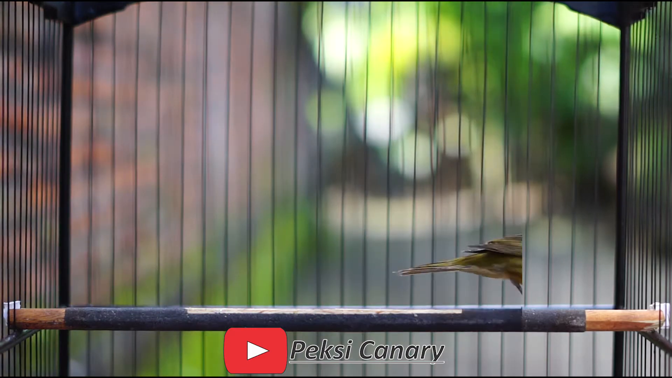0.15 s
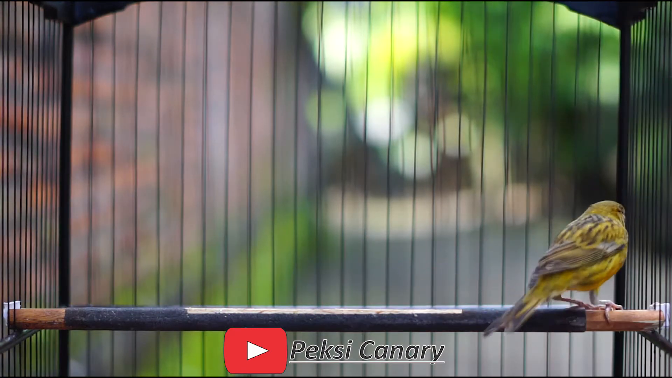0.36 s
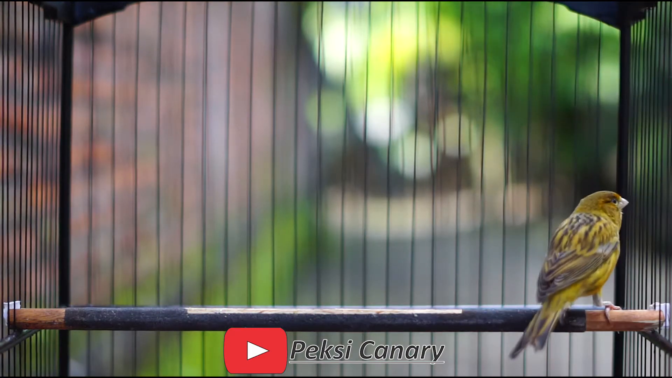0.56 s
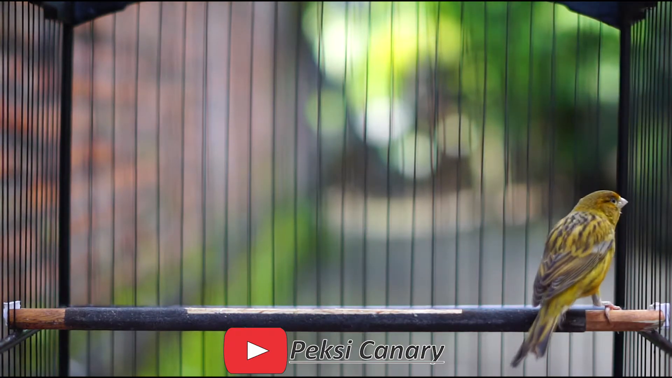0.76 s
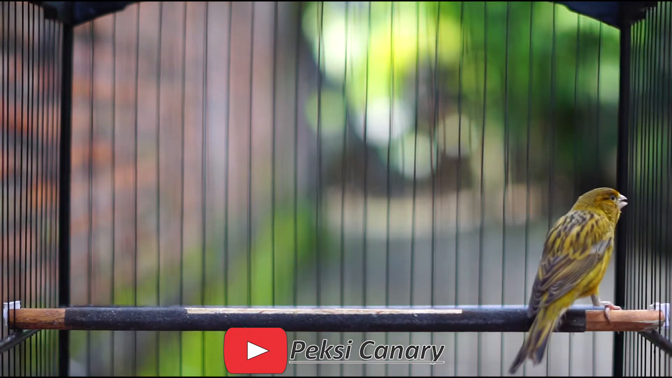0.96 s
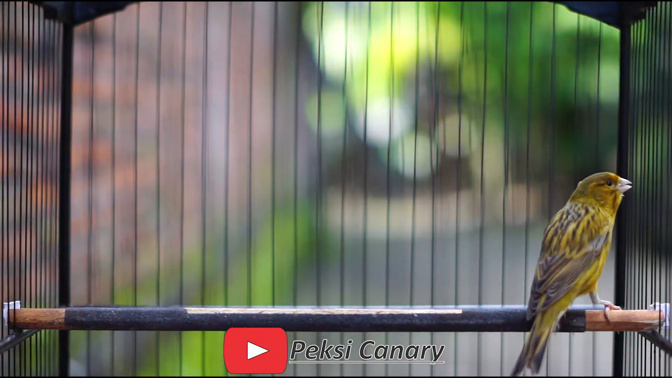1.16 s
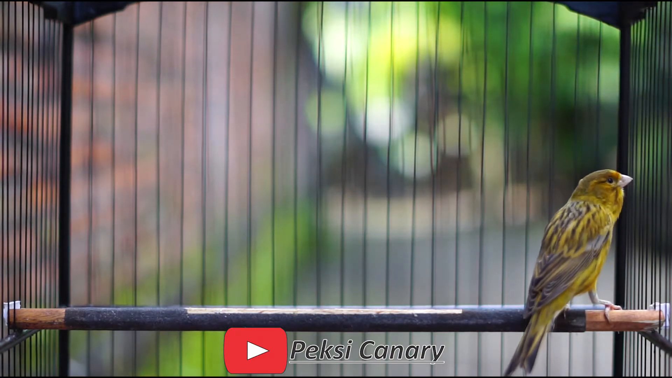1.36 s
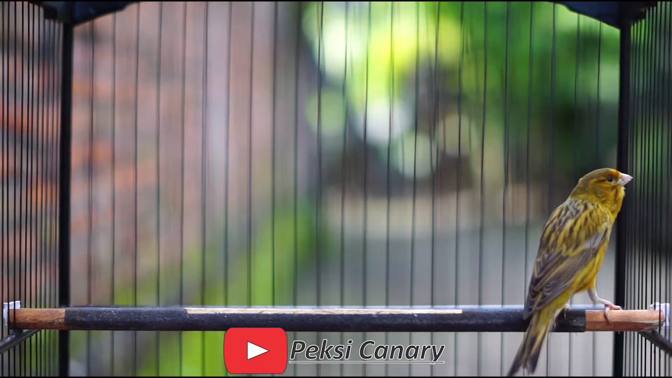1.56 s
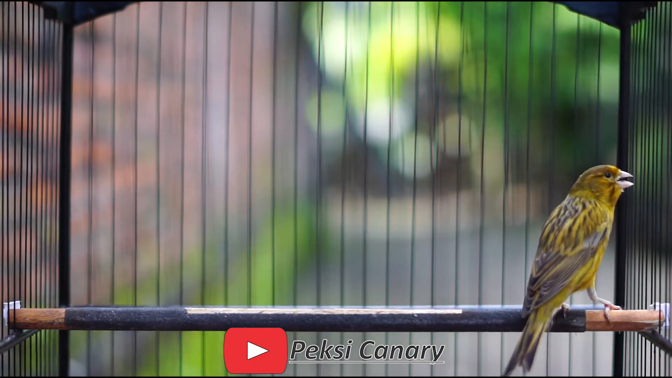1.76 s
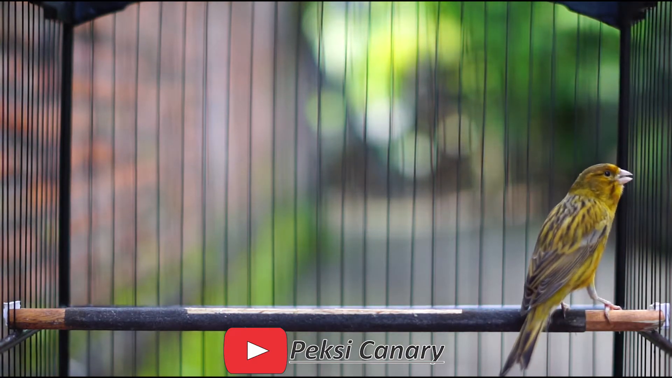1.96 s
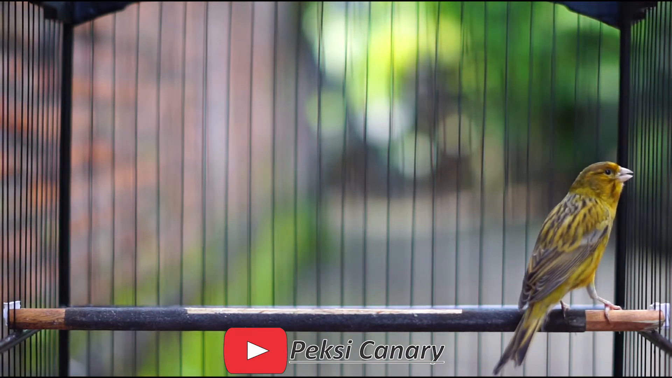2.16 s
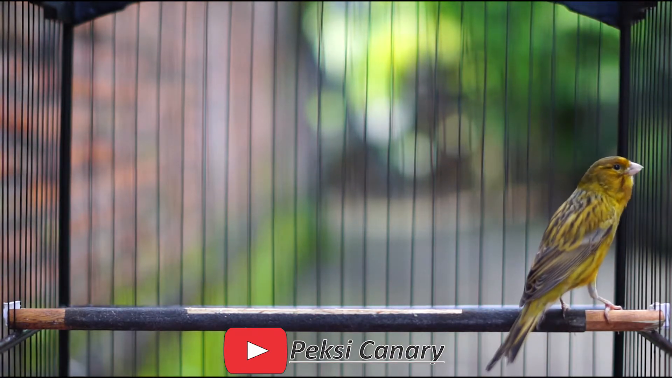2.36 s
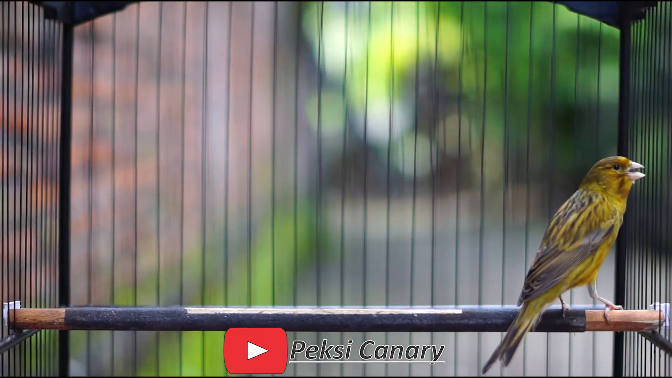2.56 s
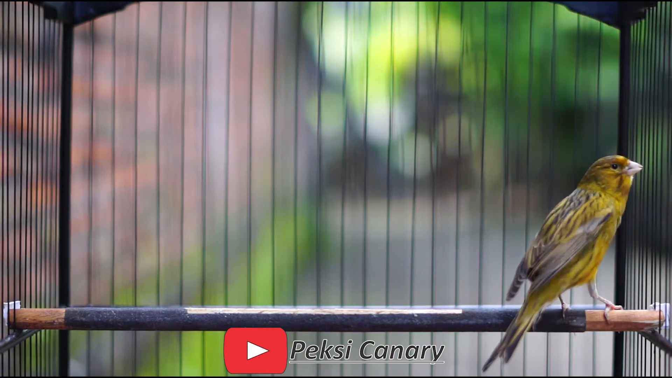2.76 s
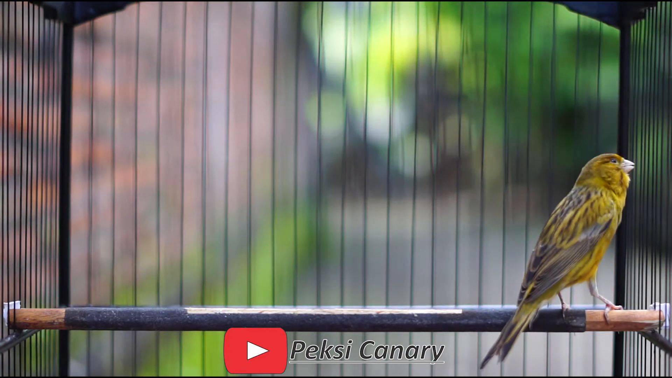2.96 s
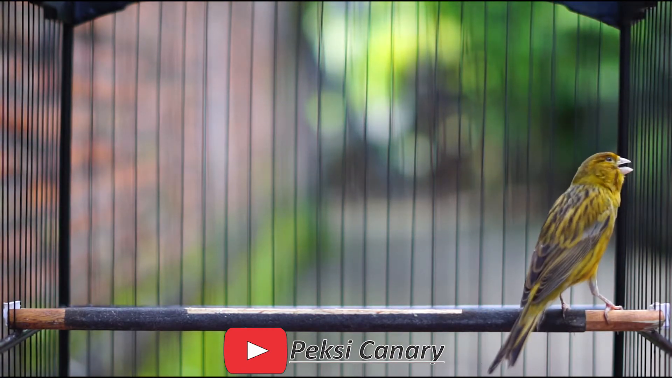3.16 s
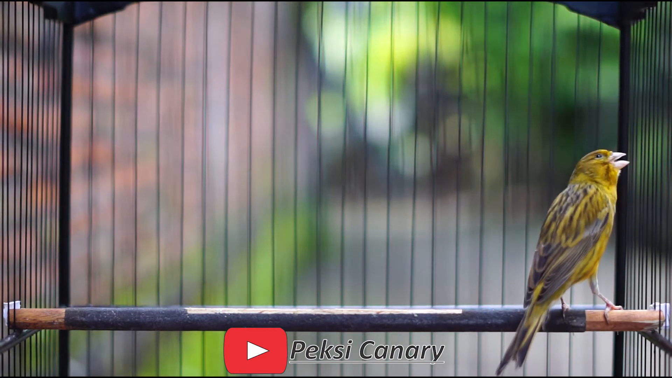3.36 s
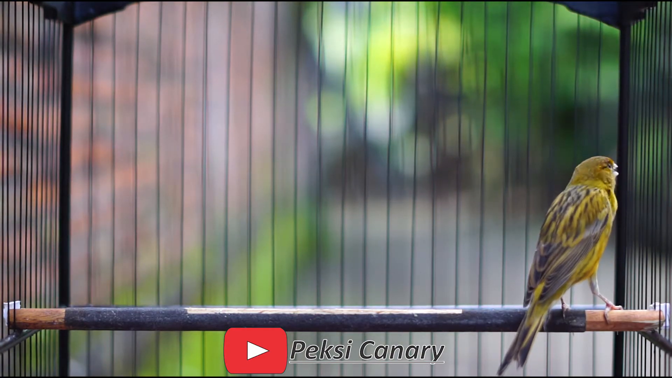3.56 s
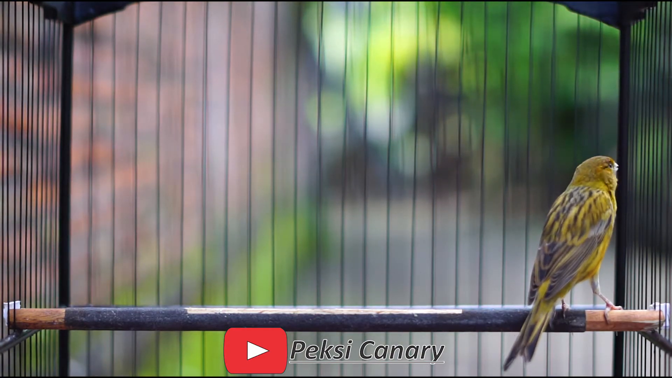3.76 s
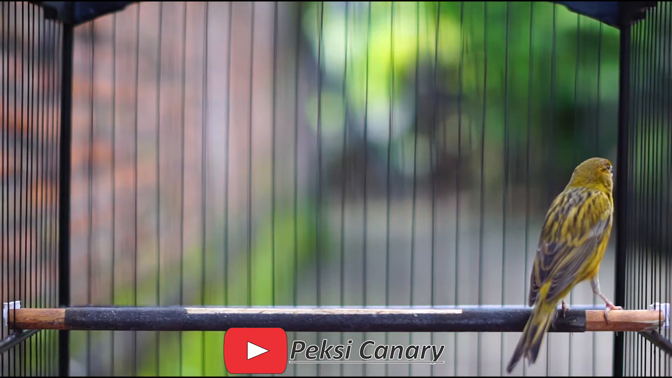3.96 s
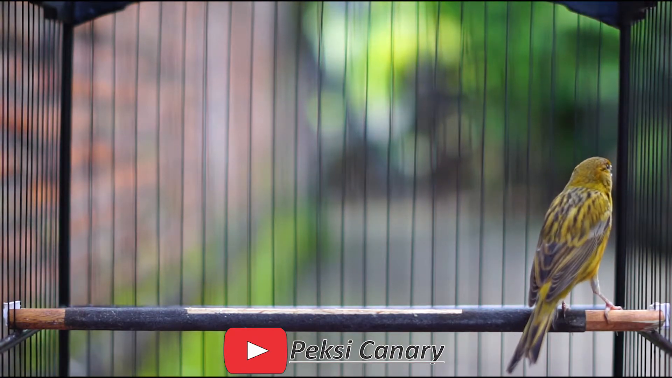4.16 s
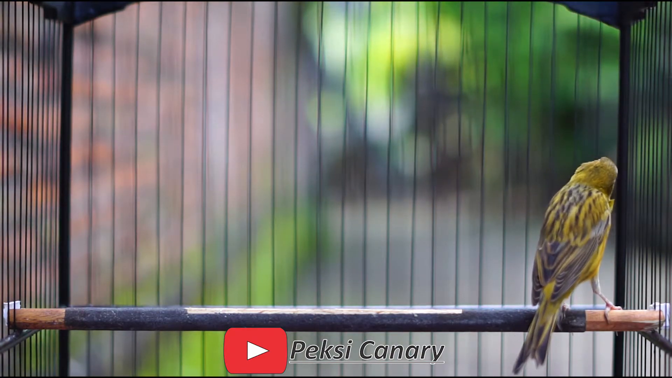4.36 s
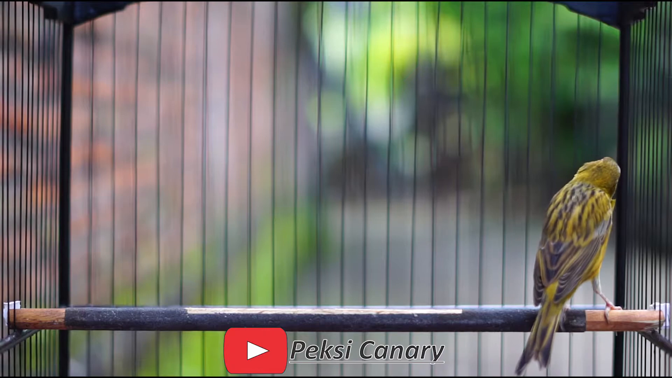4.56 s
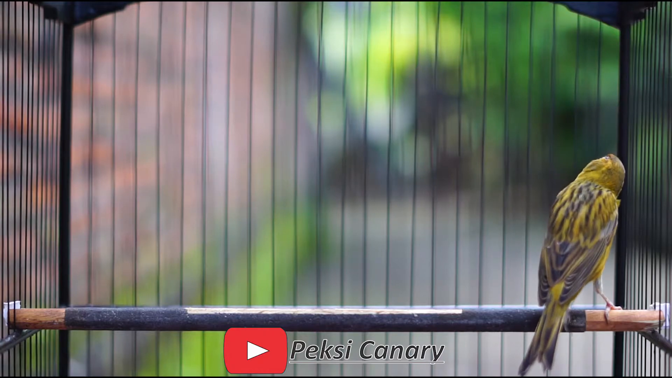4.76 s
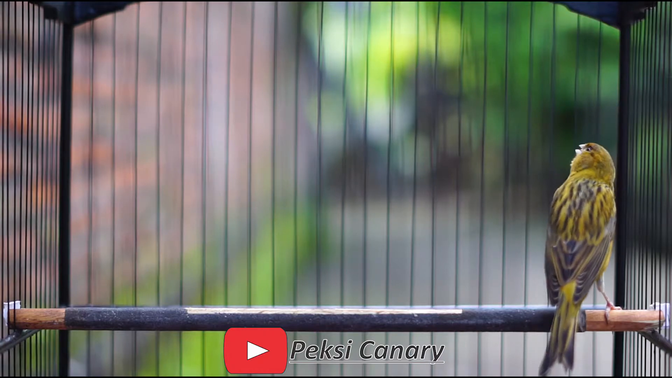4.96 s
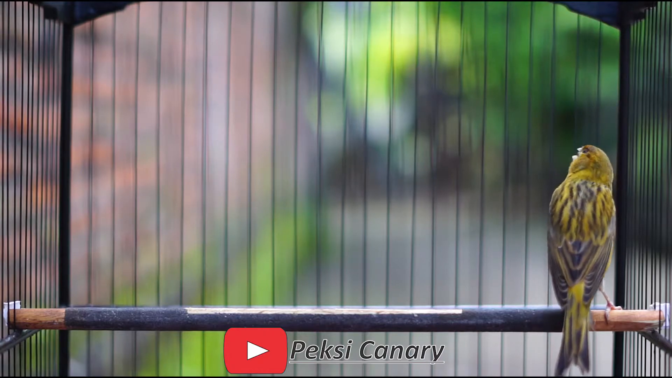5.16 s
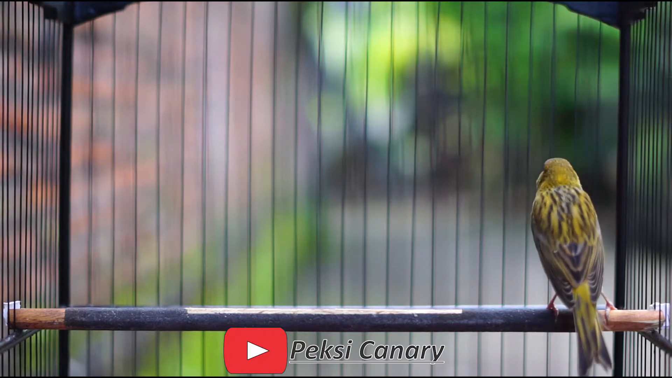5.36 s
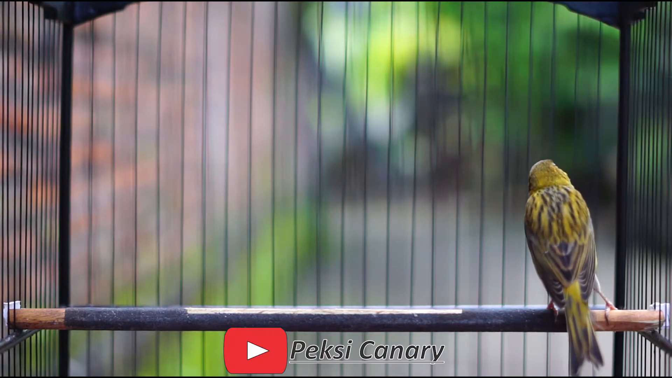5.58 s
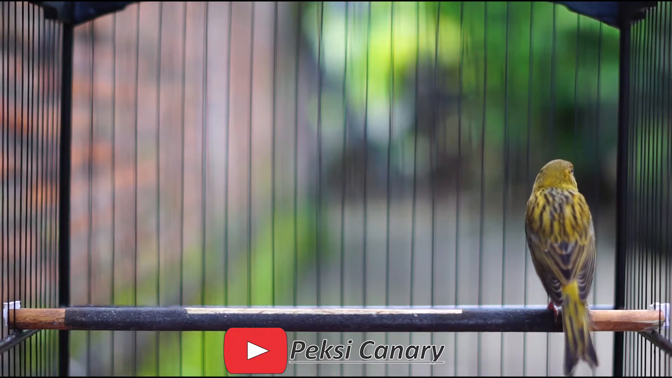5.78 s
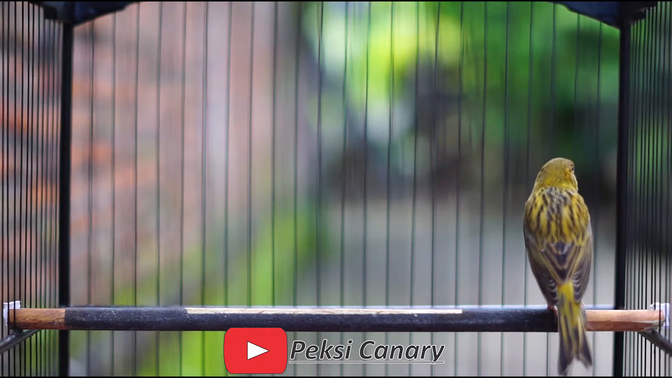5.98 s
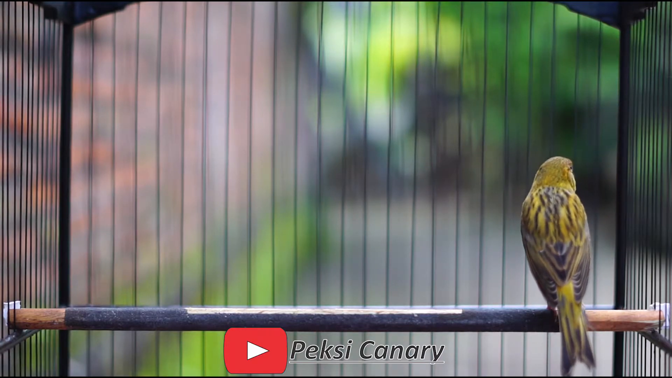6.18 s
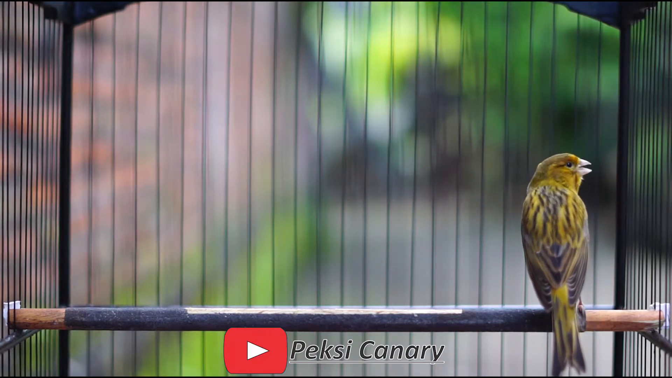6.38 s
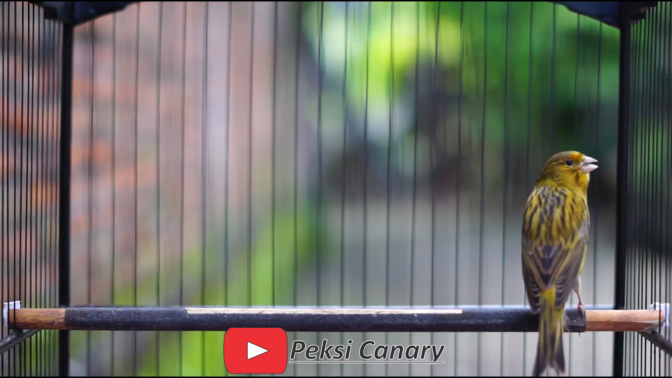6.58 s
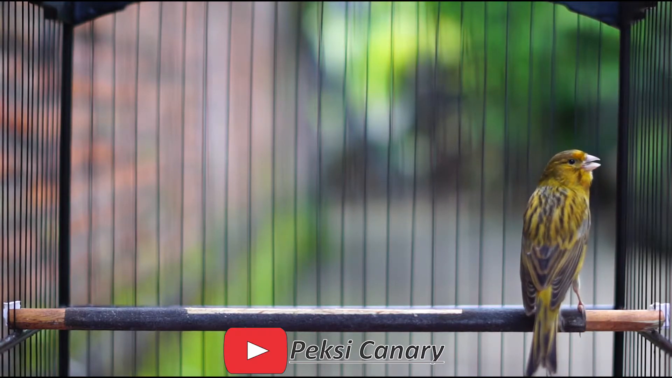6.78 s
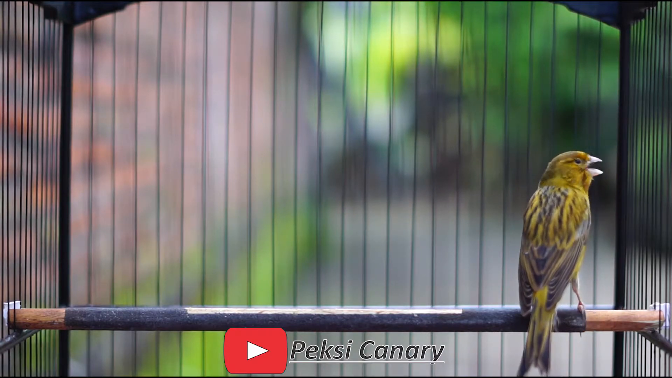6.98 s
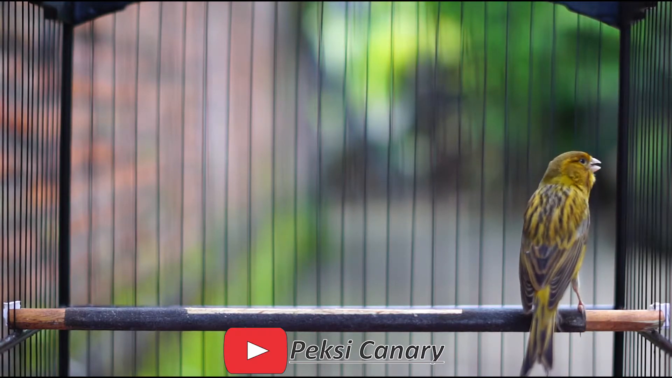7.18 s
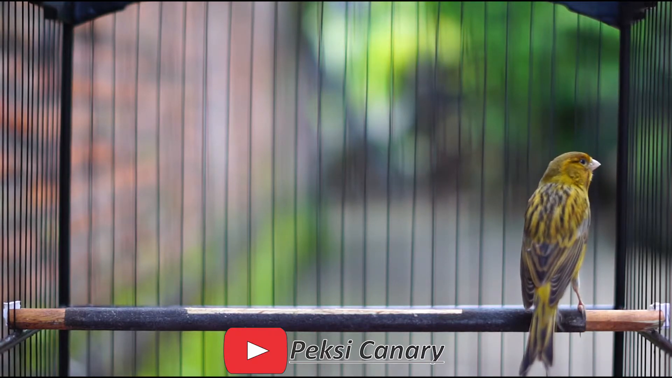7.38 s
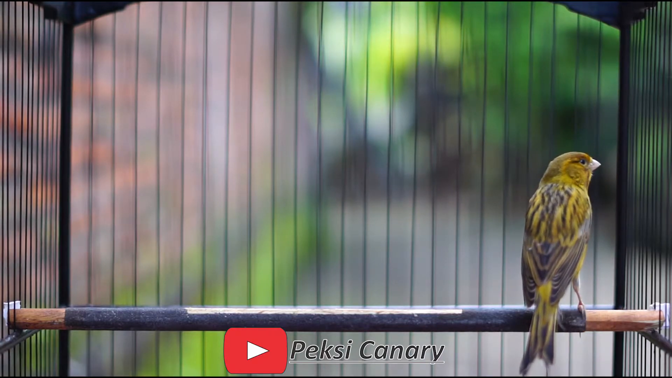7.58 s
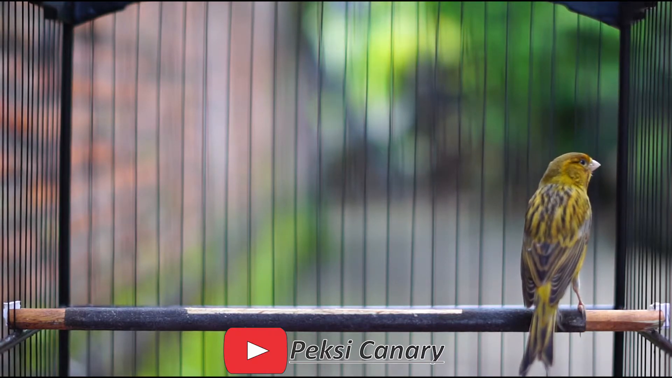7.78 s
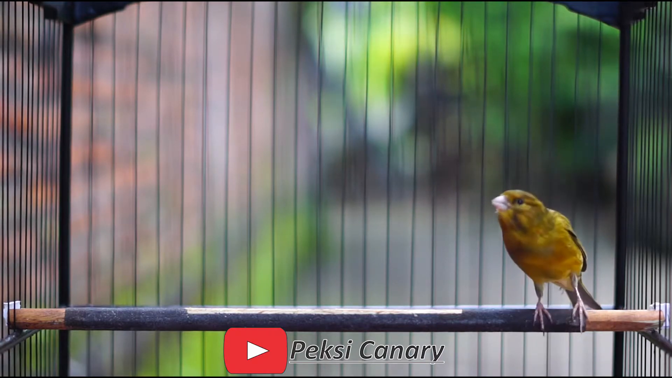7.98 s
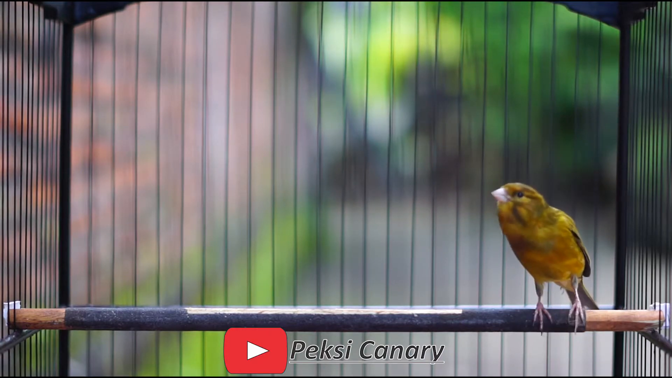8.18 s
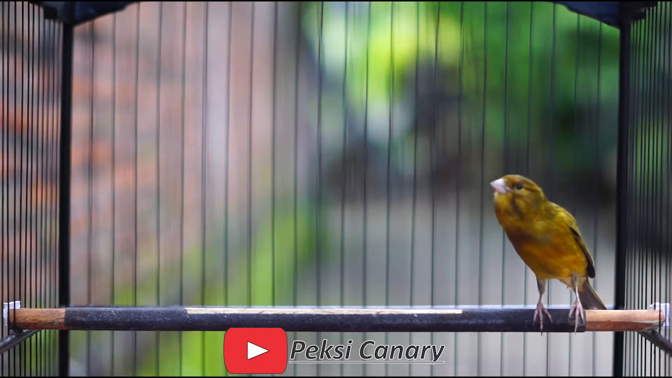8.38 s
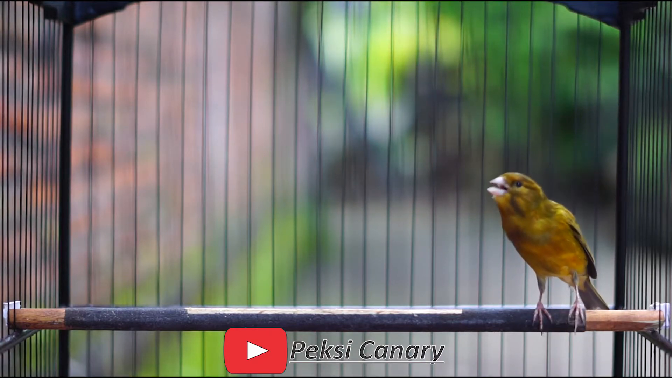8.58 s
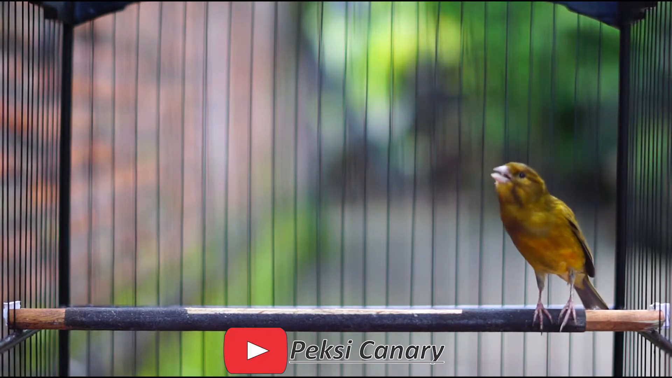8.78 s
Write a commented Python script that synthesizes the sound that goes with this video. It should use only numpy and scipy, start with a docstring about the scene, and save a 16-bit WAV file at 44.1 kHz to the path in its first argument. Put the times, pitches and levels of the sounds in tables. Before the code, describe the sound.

Bright, close canary song moves from short chirps through rolling notes, long sinking whistles, quick climbing whistles and a rapid trill, with a brief gap before resuming.

```python
"""Canary in a cage

A canary sings in a wire cage by a wall: chirps, a rolling three-note tour, long falling whistles, rising
whistles, a fast trill, a pause, and the tour again. Each note is a gliding near-pure tone with weak overtones,
coloured by the throat and by close echoes. Feet tick (dying noise); fluttering noise, hissy and deep, swells
softly early on and sets in suddenly near 7.8 s for about a second. A low noise rumble, a hum of wavering
sines and faint gliding calls lie behind.
"""
import sys
import numpy as np
from scipy import signal
from scipy.fft import rfft, irfft
from scipy.io import wavfile
from scipy.ndimage import uniform_filter1d

SR = 44100
rng = np.random.default_rng(int(sys.argv[2]) if len(sys.argv) > 2 else 0)


def generate_wav(sig):
    """Save sig (samples, or channels by samples) to the path in sys.argv[1] as 16-bit PCM at SR."""
    pcm = np.round(np.clip(np.atleast_2d(sig).T, -1, 1) * 32767).astype(np.int16)
    wavfile.write(sys.argv[1], SR, pcm)


N = 389403
TIME = np.arange(N) / SR

# How loud the far rumble is as time passes; the hum follows it too.
# Each row: time in seconds, level in dB.
RUMBLE_LEVEL = [(.1, -61), (1.2, -45), (1.45, -58.5), (2.85, -57.5), (3.15, -52.5), (3.45, -53.5),
                (3.8, -54), (5, -51), (5.2, -59), (7.4, -66), (7.55, -57.5)]


def from_db(db):
    """Turn decibels into a gain."""
    return 10 ** (np.asarray(db) / 20)


def gain_at(points, hz):
    """Read the gain of a spectrum at these frequencies."""
    known_hz, db = np.transpose(points)
    return from_db(np.interp(np.log(hz + 1), np.log(known_hz), db))


def curve_at(rows, when):
    """Read each column of a table at these times; the first column is the time."""
    s, *columns = np.transpose(rows)
    return [np.interp(when, s, column) for column in columns]


def add(out, s, sound):
    """Mix a sound in, starting at a time in seconds."""
    start = max(round(s * SR), 0)
    out[start:start + len(sound)] += sound[:max(N - start, 0)]


def drift(rate, size):
    """Random wandering around 0: straight lines between random points, 'rate' points a second."""
    knots = np.arange(size) / SR * rate
    return np.interp(knots, np.arange(size), rng.standard_normal(size))


def noise(colour):
    """Noise with a given spectrum, scaled to an rms of 1."""
    hz = np.fft.rfftfreq(N, 1 / SR)
    spectrum = rfft(rng.standard_normal(N)) * gain_at(colour, hz) * (hz > 20)
    x = irfft(spectrum, N)
    return x / np.std(x)


def rush(gain, colour, flutter_db, flutter_rate):
    """Noise that follows a gain and flutters round it."""
    return gain * from_db(flutter_db * drift(flutter_rate, N)) * noise(colour)


def swells(rows, sag_db_per_s, release_db_per_s):
    """Gain of bursts that rise, sag while they last and then die away; the loudest one counts."""
    out = np.zeros(N)
    for s, rise_s, length, level_db in rows:
        age = np.maximum(TIME - s, 0)
        fade_db = sag_db_per_s * age + release_db_per_s * np.maximum(age - length, 0)
        burst = np.minimum(age / rise_s, 1) * from_db(level_db - fade_db)
        out = np.maximum(out, burst)
    return out


def progress(length):
    """Run from 0 to 1 over a note."""
    return np.linspace(0, 1, int(length * SR))


def bump(along, at, width):
    """A smooth hump of height 1 around one value."""
    return np.exp(-((along - at) / width) ** 2)


def glide(pitches, length):
    """Pitch that passes evenly spaced points, with rounded corners."""
    along = progress(length)
    hz = np.interp(along, np.linspace(0, 1, len(pitches)), pitches)
    return uniform_filter1d(hz, size=len(hz) // 8, mode="nearest")


def rumble():
    """A far rumble: mostly deep noise whose level wanders over time."""
    # Spectrum of the rumble. Each row: frequency in Hz, strength in dB per Hz.
    rumble_colour = [(25, -30.5), (40, -15.5), (55, 5), (85, -1.5), (130, -13), (190, -26), (400, -36.5),
                     (650, -38.5), (1100, -45.5), (2000, -34.5), (15000, -63.5)]
    level = from_db(curve_at(RUMBLE_LEVEL, TIME)[0])
    return rush(level, rumble_colour, flutter_db=.5, flutter_rate=10)


def hum():
    """A faint hum: sine waves that waver in pitch and swell and fade with the rumble."""
    # Tones of the hum. Each row: frequency in Hz, level in dB relative to the rumble.
    hum_lines = [(82, -18.5), (272, -23.5), (410, -28)]
    lines = np.zeros(N)
    for hz, db in hum_lines:
        wavering_hz = hz + 3 * drift(9.8, N)
        lines += from_db(db) * np.sin(2 * np.pi * np.cumsum(wavering_hz) / SR)
    return from_db(curve_at(RUMBLE_LEVEL, TIME)[0]) * lines


def deep_noise():
    """Deep fluttering background noise that comes in abruptly, stays about a second and stops, twice."""
    # Each row: start in seconds, rise in seconds, length in seconds, level in dB.
    deep_bursts = [(.08, 0.014, 0.91, -45.5), (7.8, 0.031, 0.92, -46)]
    # Spectrum of the deep noise. Each row: frequency in Hz, strength in dB per Hz.
    deep_colour = [(25, -12.5), (55, -3.5), (90, 6), (170, -9), (400, -26), (1000, -31), (2500, -32),
                   (8000, -72)]
    level = swells(deep_bursts, sag_db_per_s=5.5, release_db_per_s=55.0)
    return rush(level, deep_colour, flutter_db=2, flutter_rate=20)


def far_calls(waver=.11):
    """Thin far-off calls: single gliding sines whose pitch wavers fast, as if blurred by distance."""
    # Each row: start in seconds, length in seconds, level in dB, start pitch in Hz, end pitch in Hz.
    call_rows = [(0.918, 0.19, -59, 790, 880), (1.288, 0.34, -62, 842, 1028), (1.98, 0.23, -65, 820, 693),
                 (3.152, 0.28, -58, 1560, 1500), (3.174, 0.13, -64, 837, 770),
                 (3.379, 0.22, -47, 5600, 5250), (4.55, 0.55, -71.5, 930, 1006),
                 (5.417, 0.21, -55.5, 5950, 5770)]
    out = np.zeros(N)
    for s, length, level_db, start_hz, end_hz in call_rows:
        size = int(length * SR)
        hz = np.linspace(start_hz, end_hz, size) * (1 + waver * drift(280, size))
        tone = np.sin(2 * np.pi * np.cumsum(hz) / SR)
        add(out, s, from_db(level_db) * np.sqrt(np.hanning(size)) * tone)
    return out


def hissy_noise():
    """Fluttering noise: one soft swell early on, then a background hiss that sets in suddenly near 7.8 s."""
    # Each row: start in seconds, rise in seconds, length in seconds, level in dB.
    hiss_bursts = [(.25, 0.082, 0.2, -47.5), (7.808, 0.011, 0.024, -51.5), (7.9, .03, .93, -59)]
    # Spectrum of the hissy noise. Each row: frequency in Hz, strength in dB per Hz.
    hiss_colour = [(400, -10), (1500, -13), (4500, 0.5), (6200, -8.0), (8500, -26.5),
                   (12500, -16.5), (15500, -32.5)]
    level = swells(hiss_bursts, sag_db_per_s=2.5, release_db_per_s=119.5)
    return rush(level, hiss_colour, flutter_db=3.5, flutter_rate=45)


def ticks(t60=0.37):
    """Feet and beak touch perch and wires; each touch leaves the wires shivering, t60 seconds to fall 60 dB."""
    # Touches. Each row: time in seconds, level in dB.
    touch_rows = [(0.085, -64), (1.572, -51.5), (2.086, -45.5), (2.599, -55), (3.121, -52.5),
                  (3.676, -52.5), (4.138, -51), (4.562, -50.5), (4.978, -48), (5.825, -55.5), (6.334, -53),
                  (6.821, -54.5), (7.289, -57), (7.727, -58.5), (7.811, -51)]
    # Spectrum of a touch. Each row: frequency in Hz, strength in dB per Hz.
    touch_colour = [(250, -11), (700, -6), (2200, 1), (4500, 0), (8000, -9.5), (15000, -11)]
    touches = np.zeros(N)
    for s, level_db in touch_rows:
        add(touches, s, from_db([level_db]))
    kept_each_sample = from_db(-60 / (t60 * SR))
    # the tiny offset keeps the filter away from extremely small numbers
    shiver = signal.lfilter([1], [1, -kept_each_sample], touches + 1e-18)
    return shiver * noise(touch_colour)


def whistle(hz, level_db, attack, release, overtone_db, waver=0.0071, rasp_db=-40, hiss_db=-40):
    """One note: the syrinx swells and closes, and its weak overtones sweep through the throat's resonances."""
    # Gain of throat and beak. Each row: frequency in Hz, gain in dB.
    throat = [(1400, 2.5), (2000, -10), (2500, -9.5), (3100, -4), (3650, -1), (4200, -1.5), (4850, -1),
              (5450, -3.5), (5850, -6), (6300, -21.5), (6900, -14), (8000, -11.5), (10300, -7),
              (12000, 0.5), (14500, 0), (15500, -4.5)]
    size = len(hz)
    along = np.linspace(0, 1, size)
    # attack and release are shares of the note, at least 4 ms long
    shortest = .004 * SR / size
    opening = np.sin(np.pi / 2 * np.minimum(along / max(attack, shortest), 1))
    closing = np.sin(np.pi / 2 * np.minimum((1 - along) / max(release, shortest), 1))
    swell = (opening * closing) ** 2
    # pressure is never quite steady: the note wavers in level and has small kinks in pitch
    swell = swell * from_db(1.1 * drift(110, size))
    hz = hz * (1 + waver * drift(150, size) + .006 * drift(60, size))
    # turbulence shakes the phase, which spreads a noisy skirt round every partial
    phase = 2 * np.pi * np.cumsum(hz) / SR + from_db(rasp_db) * drift(3600, size)
    tone = gain_at(throat, hz) * np.sin(phase)
    # low, gently blown pitches are almost pure
    drive = np.minimum(hz / 3600, 1) ** 3
    for k, db in [(2, -16), (3, -18), (4, -29)]:
        shimmer_db = 5 * drift(180, size)
        strength = drive * from_db(db + overtone_db + shimmer_db)
        audible = k * hz < SR / 2
        tone += strength * gain_at(throat, k * hz) * audible * np.sin(k * phase)
    # a trace of bright hiss rides on the note; taking differences twice brightens the noise
    bright_noise = np.diff(np.diff(rng.standard_normal(size + 2))) / 2
    hiss = from_db(hiss_db) * gain_at(throat, hz) * bright_noise
    return from_db(level_db) * swell * (tone + hiss)


def chirps(gain_db=-5.0):
    """Lone notes before a tour, each one curl through four pitches."""
    # Each row: start in seconds, length in seconds, level in dB before gain_db is added,
    # pitch in Hz at the start, one third, two thirds and the end.
    chirp_rows = [(0.443, 0.046, -11.5, 4030, 4100, 3930, 4250),
                  (0.47, 0.04, -13.5, 4550, 5250, 4830, 4550),
                  (0.592, 0.059, -19.5, 2023, 1920, 2520, 2557),
                  (0.722, 0.043, -28.5, 1626, 1540, 2050, 2740), (0.928, 0.07, -26, 1845, 2400, 3020, 2730),
                  (7.944, 0.059, -14, 3840, 3880, 3950, 4170)]
    out = np.zeros(N)
    for s, length, level_db, *pitches in chirp_rows:
        note = whistle(glide(pitches, length), level_db + gain_db, attack=0.4, release=0.092,
                       overtone_db=-7.5)
        add(out, s, note)
    return out


def scoop(pitch_hz, length, depth, settle, hook):
    """Pitch of a short note that starts low, levels off and ends in a hook; no two alike."""
    along = progress(length)
    flat = np.maximum(1 - along / settle, 0) ** 2 * (1 + .1 * rng.standard_normal())
    # centre the second half of the scoop on the given pitch
    flat = flat - flat[len(flat) // 2:].mean()
    end_hook = (hook + .02 * rng.standard_normal()) * along ** 4
    return pitch_hz * (1 + end_hook - depth * flat)


def tour():
    """Low, high, middle: one side of the syrinx slides faintly from low to middle, the other arches over."""
    # Three-note syllables. Each row: start of the high note in seconds, its level in dB, its pitch in Hz.
    syllables = [(0.984, -15, 5362), (1.144, -17, 5300), (1.308, -14, 5353), (1.474, -16.5, 5274),
                 (1.638, -11, 5044), (1.8, -16.5, 5240), (1.966, -13, 5336), (2.133, -17, 5200),
                 (2.292, -15.5, 5117), (2.463, -14, 5205), (8.128, -11, 5197), (8.299, -10, 5233),
                 (8.47, -11, 5170), (8.633, -9, 5220), (8.8, -12, 5304)]
    # What changes only slowly. Each row: time in seconds, low note level in dB before its trim,
    # middle note level in dB before its push, middle note pitch in Hz,
    # end hook of the high note as a share of its pitch, overtones in dB before each note's trim.
    trend = [(.98, -36, -18.5, 4075, -.06, -4.5), (1.15, -9.5, -17, 3979, -0.069, -2.5),
             (2.46, -9.5, -17.5, 3949, -0.051, -3), (8.13, -11, -18, 4124, 0.016, 6)]
    low_hz, low_s, high_s, mid_s = 2540, 0.048, 0.053, 0.037
    low_lead_s, mid_lag_s = 0.046, 0.041   # before and after the start of the high note
    out = np.zeros(N)
    for s, high_db, high_hz in syllables:
        low_db, mid_db, mid_hz, hook, bright_db = curve_at(trend, s)
        low = scoop(low_hz, low_s, depth=.26, settle=.75, hook=0)
        high = scoop(high_hz, high_s, depth=0.13, settle=0.718, hook=hook)
        mid = scoop(mid_hz, mid_s, depth=.11, settle=.7, hook=0)
        link = glide([low[-1], low[-1], mid[0]], mid_lag_s + .01)
        # the middle note is pushed hardest just past its midpoint
        push_db = 8 * bump(progress(mid_s), at=.58, width=.2)
        uneven_low_db = low_db - 4.5 + 1.2 * rng.standard_normal()
        add(out, s - low_lead_s, whistle(low, uneven_low_db, attack=0.81, release=0.34,
                                         overtone_db=bright_db - 13.5, rasp_db=-27.5))
        add(out, s - .005, whistle(link, -50, attack=.1, release=.1, overtone_db=-20))
        add(out, s, whistle(high, high_db, attack=.62, release=.42,
                            overtone_db=bright_db - 14, rasp_db=-38, hiss_db=-43))
        add(out, s + mid_lag_s, whistle(mid, mid_db + push_db, attack=.35, release=.25,
                                        overtone_db=bright_db - 9, rasp_db=-30))
    return out


def falls(gain_db=-3, push_db=5, uneven_db=1.26):
    """Long whistles that sink to a knee and drop; the pressure is uneven, and hardest in the drop."""
    # Each row: start in seconds, length in seconds, level in dB before gain_db and the push,
    # time to the knee in seconds, pitch at the knee in Hz, end pitch in Hz.
    fall_rows = [(2.608, 0.21, -14.5, 0.089, 4450, 3017), (2.879, 0.18, -17.5, 0.12, 4760, 2910),
                 (3.105, .217, -16.5, .17, 4480, 2900), (3.372, 0.21, -15, 0.14, 4780, 2878),
                 (3.613, 0.2, -14, 0.14, 5060, 2885), (3.865, .22, -16, .168, 4900, 2917),
                 (4.142, .22, -16.5, .16, 4710, 2770), (4.419, 0.21, -16, 0.16, 4660, 2896),
                 (4.67, 0.23, -15.5, 0.18, 4096, 2745)]
    top_hz, bow, drop_s = 7343, 1.174, 0.038   # start pitch, bend of the sinking part, speed of the drop
    out = np.zeros(N)
    for s, length, level_db, knee_s, knee_hz, end_hz in fall_rows:
        along = progress(length)
        t = along * length
        rest_s = length - knee_s
        sink = (top_hz - knee_hz) * (1 - np.minimum(t / knee_s, 1) ** bow)
        drop = (knee_hz - end_hz) * np.clip((length - t) / rest_s, 0, 1) ** (rest_s / drop_s)
        hz = uniform_filter1d(end_hz + sink + drop, size=300, mode="nearest")   # round the knee
        hz = hz * (1 + .012 * drift(65, len(t)))
        effort_db = level_db + gain_db + push_db * bump(along, at=1.0, width=0.38)
        effort_db += uneven_db * drift(52.2, len(t))
        add(out, s, whistle(hz, effort_db, attack=0.2, release=0.034, overtone_db=-10.5, hiss_db=-43.5))
    return out


def rises(gain_db=-1, push_db=7):
    """Whistles that climb, each with its own bend, and swell as they level off."""
    # Each row: start in seconds, level in dB before gain_db and the push,
    # pitch in Hz after one, two, three and four quarters.
    rise_rows = [(4.959, -15, 3090, 4020, 4800, 5114), (5.139, -15.5, 2834, 4390, 4884, 4870),
                 (5.323, -14, 2920, 4130, 4832, 4974), (5.512, -16.5, 3110, 3950, 4880, 5050),
                 (5.705, -17, 3080, 4040, 4814, 4953), (5.887, -15.5, 2735, 4130, 4880, 5130),
                 (6.068, -17.5, 2790, 4090, 4936, 5033), (6.248, -16.5, 2860, 4040, 4800, 5096)]
    start_hz, length_s = 1455, 0.14
    out = np.zeros(N)
    along = progress(length_s)
    for s, level_db, *pitches in rise_rows:
        hz = glide([start_hz, *pitches], length_s)
        effort_db = level_db + gain_db + push_db * bump(along, at=0.85, width=0.25)
        effort_db += 2.1 * drift(90, len(along))
        add(out, s, whistle(hz, effort_db, attack=0.36, release=0.16, overtone_db=-12.0, hiss_db=-47.5))
    return out


def trill(gain_db=-2.9):
    """Quick downward sweeps: a loud crest, a break in the voice, then a second, lower pulse."""
    # One sweep a row: start in seconds, length in seconds, level in dB before gain_db and the humps below.
    sweeps = [(6.449, 0.025, -20), (6.49, 0.031, -23), (6.534, 0.021, -15.5), (6.579, 0.031, -17.5),
              (6.624, 0.033, -15), (6.671, 0.035, -13.5), (6.719, 0.038, -13), (6.765, 0.043, -14),
              (6.814, 0.046, -15), (6.866, 0.049, -14), (6.924, 0.054, -13), (6.984, 0.051, -13.5),
              (7.037, 0.061, -15), (7.099, 0.053, -14), (7.156, 0.057, -15.5), (7.22, 0.052, -15.5),
              (7.282, 0.047, -20)]
    # How the sweeps bend as the trill goes on; they sag more and end higher.
    # Each row: time in seconds, pitch in Hz after each fifth of a sweep.
    shape = [(6.58, 6110, 5300, 4620, 3310, 1580), (6.625, 6040, 4750, 4080, 3580, 1850),
             (6.815, 6310, 4940, 4000, 3607, 2350), (6.865, 5910, 4500, 3380, 2925, 2570),
             (7.1, 5810, 4090, 3224, 2804, 2730)]
    top_hz = 7000
    out = np.zeros(N)
    for s, length, level_db in sweeps:
        hz = glide([top_hz, *curve_at(shape, s)], length)
        crest_db = 5 * bump(hz, at=4950, width=790)
        break_db = -7 * bump(hz, at=4200, width=190)
        second_db = 3 * bump(hz, at=3420, width=460)
        effort_db = level_db + gain_db + crest_db + break_db + second_db
        add(out, s, whistle(hz, effort_db, attack=0.085, release=0.11, overtone_db=-7, waver=0.015,
                            hiss_db=-33))
    return out


def canary():
    """The song, all its phrases together."""
    return chirps() + tour() + falls() + rises() + trill()


def room(x):
    """Close echoes beat against the gliding notes; the wires scatter briefly; a soft, duller tail follows."""
    # Echoes from perch, cage and wall. Each row: delay in seconds, level in dB.
    echo_rows = [(.00102, -15.5), (.00213, -17), (.00254, -14), (.00445, -20), (.0096, -22)]
    t = TIME[:SR]
    room_t60_s, room_db, build_s = 0.27, -20, 0.0065
    tail = rng.standard_normal(SR) * from_db(-60 * t / room_t60_s) * (1 - np.exp(-t / build_s))
    scatter_db, scatter_peak_s = -17, 0.011
    scatter = rng.standard_normal(SR) * t * np.exp(-t / scatter_peak_s)
    bounce = from_db(room_db) * tail / np.linalg.norm(tail)
    bounce += from_db(scatter_db) * scatter / np.linalg.norm(scatter)
    bounce = signal.sosfilt(signal.butter(2, 7000, fs=SR, output="sos"), bounce)
    for delay, level_db in echo_rows:
        bounce[round(delay * SR)] += from_db(level_db)
    # overtones are beamed away from the listener, so much of them arrives as a bright, diffuse sheen
    sheen_db, sheen_t60_s = -6, 0.11   # level before the high-pass
    sheen = rng.standard_normal(SR) * from_db(-60 * t / sheen_t60_s)
    sheen *= from_db(sheen_db) / np.linalg.norm(sheen)
    bounce += signal.sosfilt(signal.butter(4, 8500, "high", fs=SR, output="sos"), sheen)
    return x + signal.fftconvolve(x, bounce)[:N]


def scene():
    """Song, ticks, hissy noise and far calls pass through the room; the low background is added dry."""
    in_room = room(canary() + hissy_noise() + ticks() + far_calls())
    return (in_room + deep_noise() + rumble() + hum())[None]


def record(dry):
    """Cut the top steeply, above 15800 Hz."""
    steep_cut = signal.ellip(12, .1, 80, 15800, fs=SR, output="sos")
    return signal.sosfilt(steep_cut, dry)


dry = scene()
out = record(dry)
generate_wav(out)
```